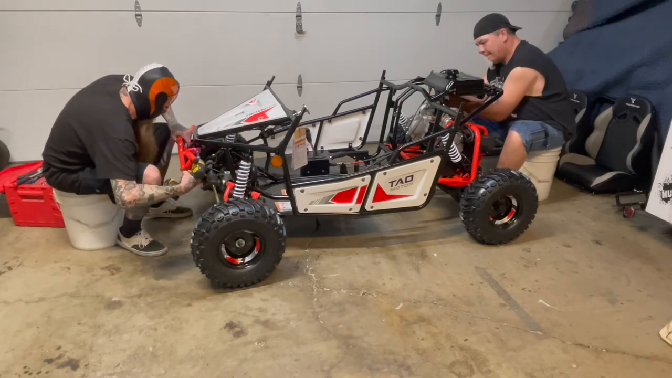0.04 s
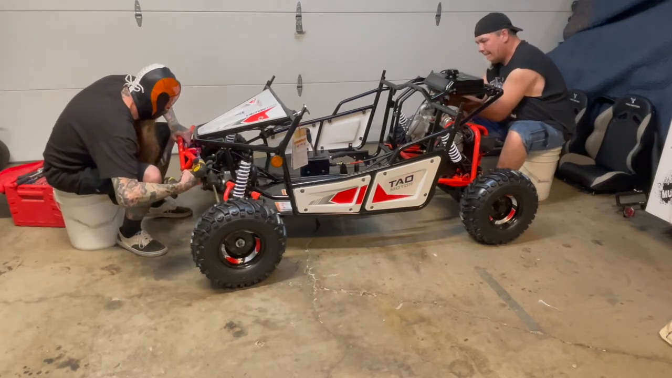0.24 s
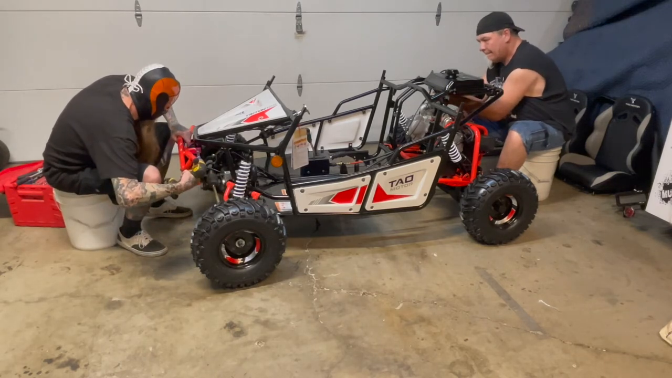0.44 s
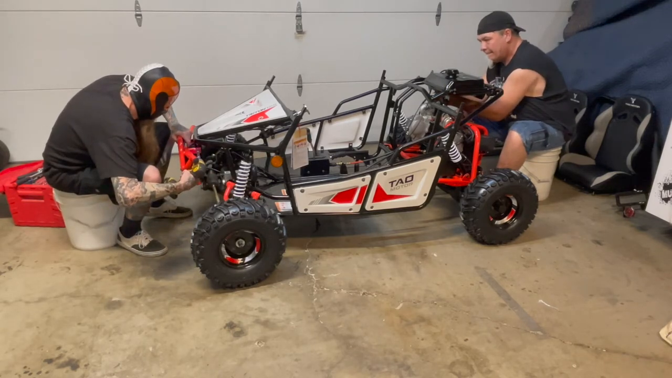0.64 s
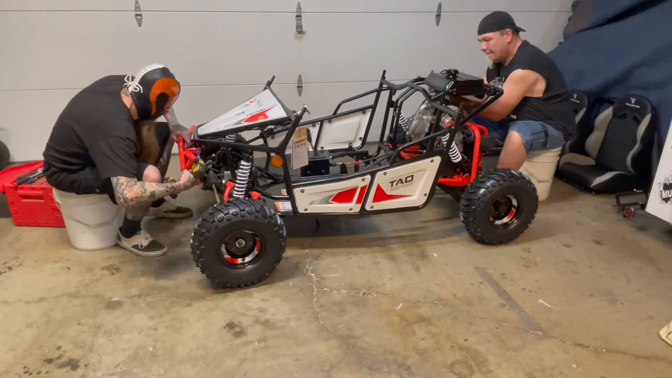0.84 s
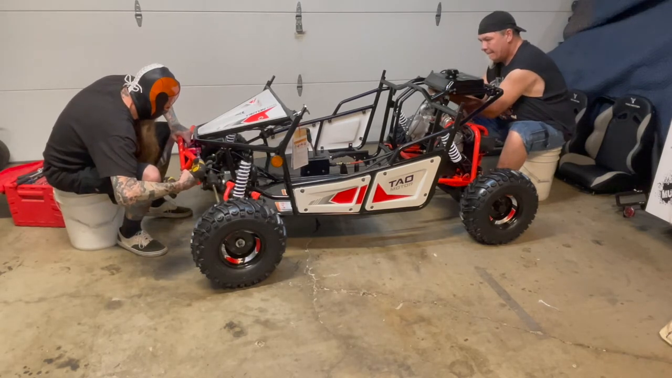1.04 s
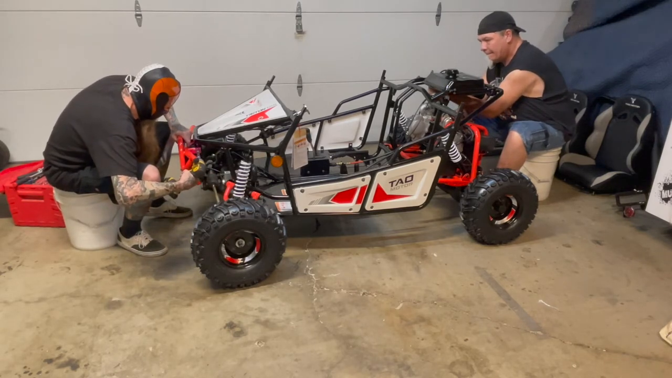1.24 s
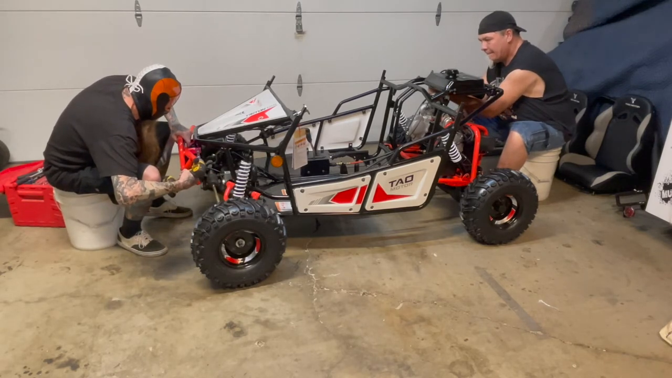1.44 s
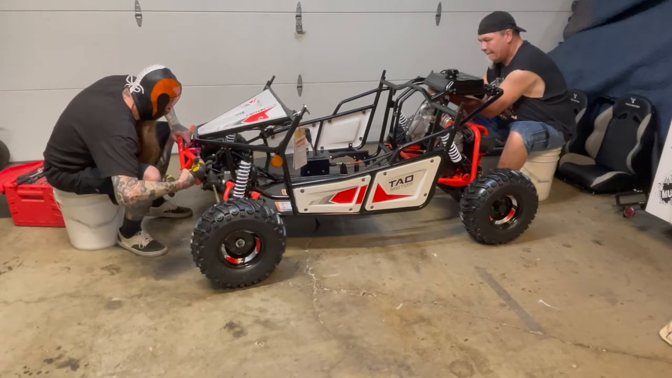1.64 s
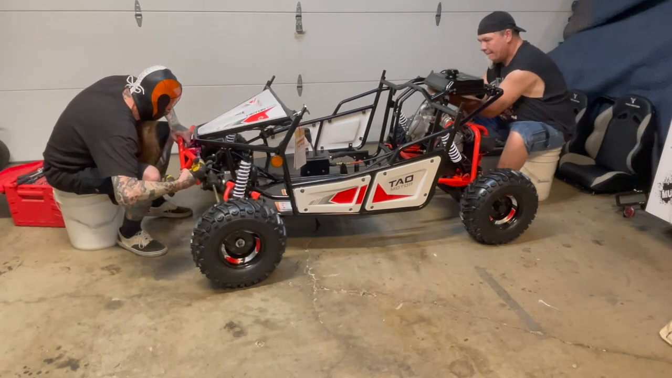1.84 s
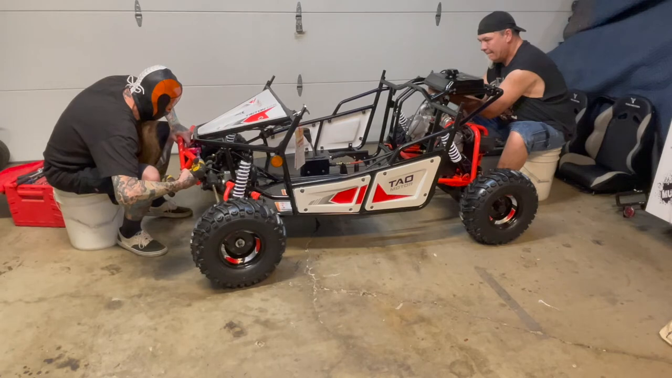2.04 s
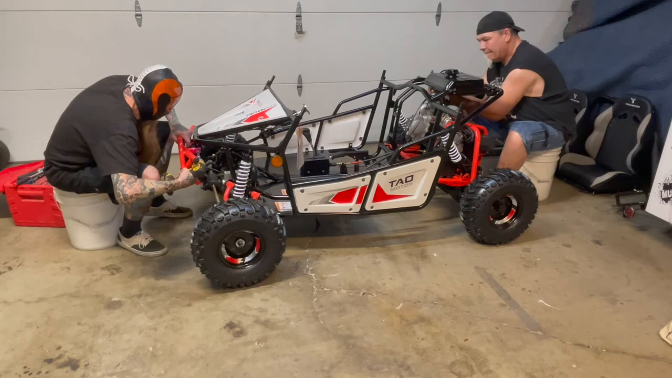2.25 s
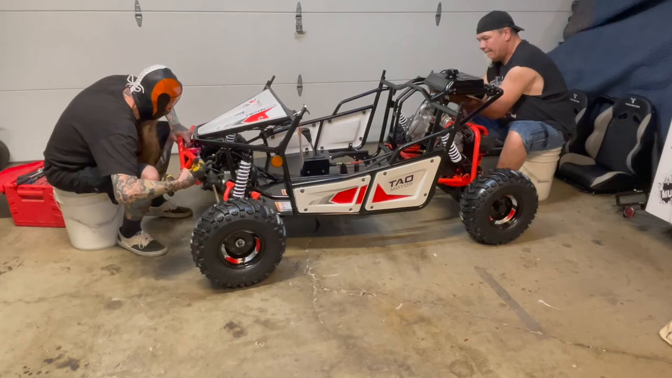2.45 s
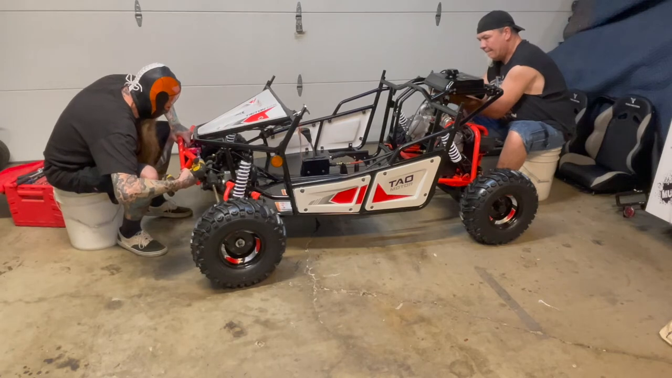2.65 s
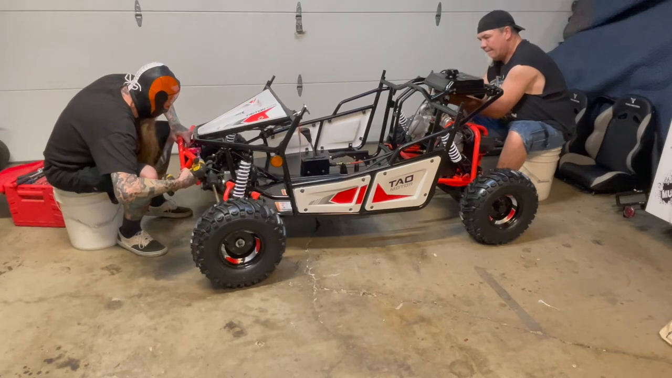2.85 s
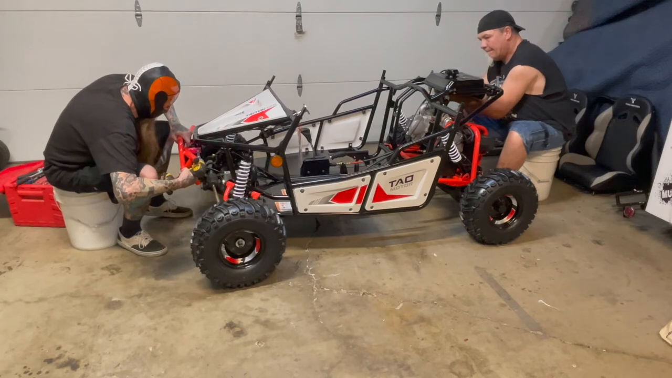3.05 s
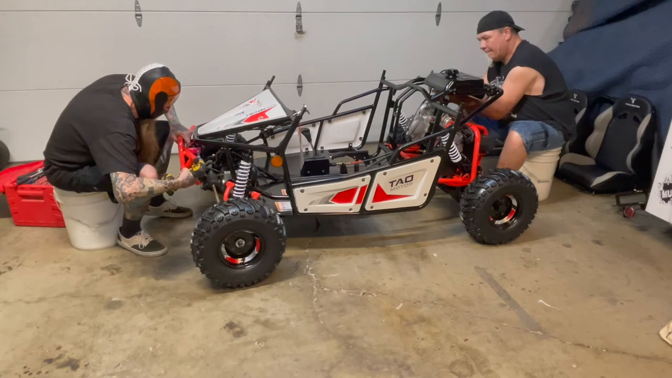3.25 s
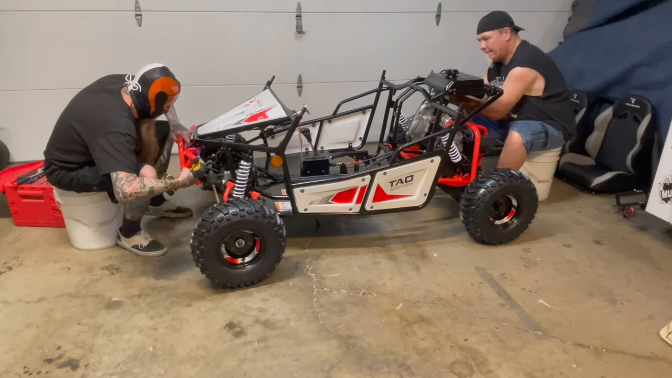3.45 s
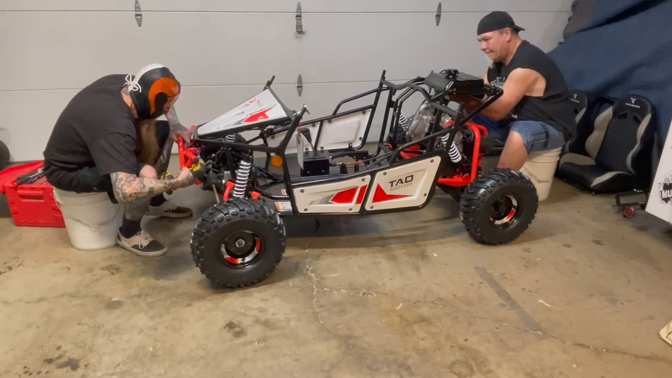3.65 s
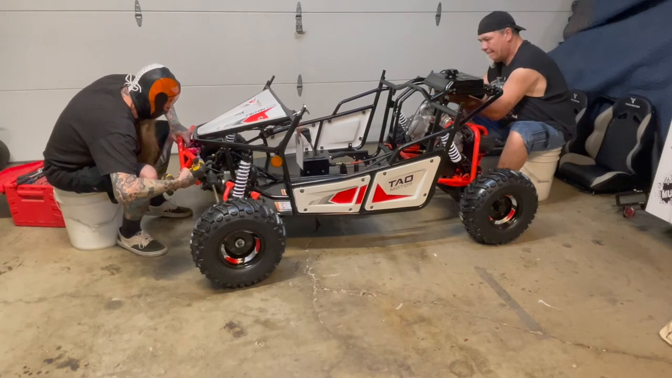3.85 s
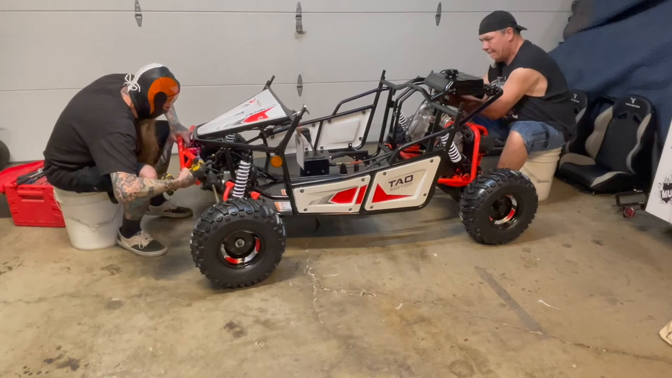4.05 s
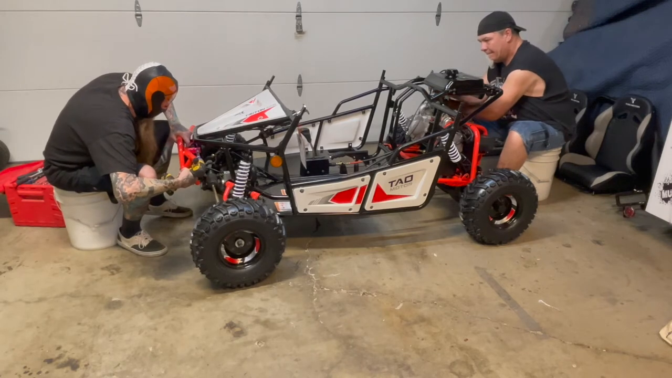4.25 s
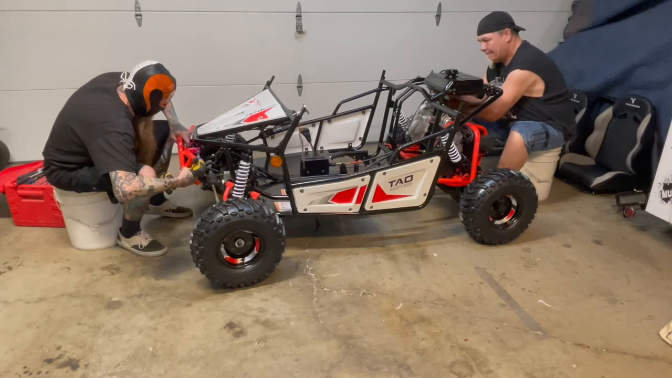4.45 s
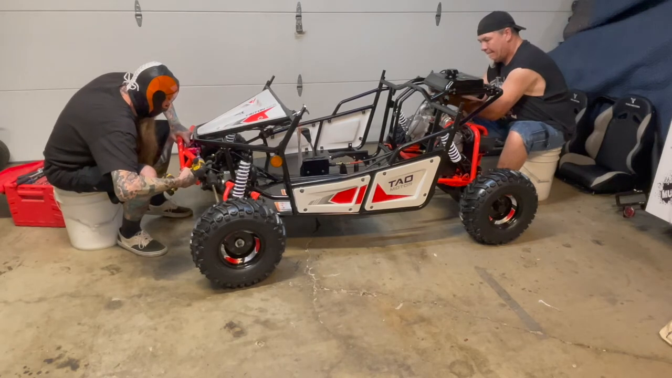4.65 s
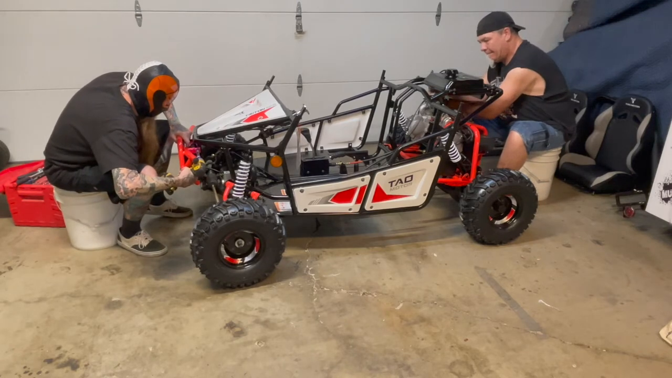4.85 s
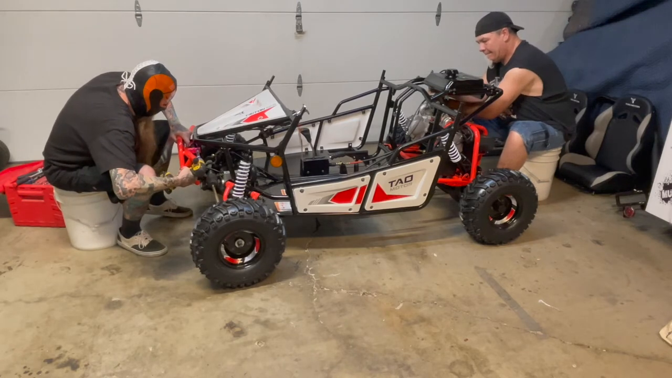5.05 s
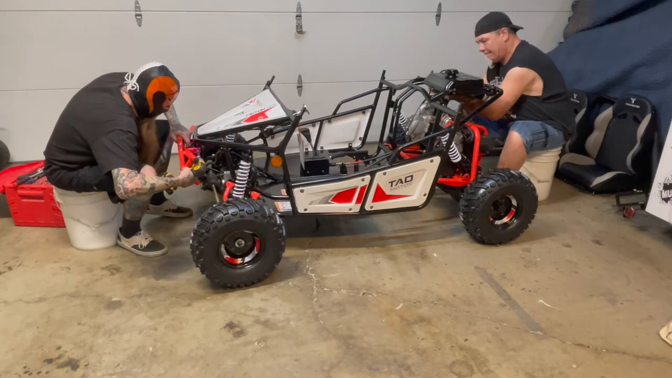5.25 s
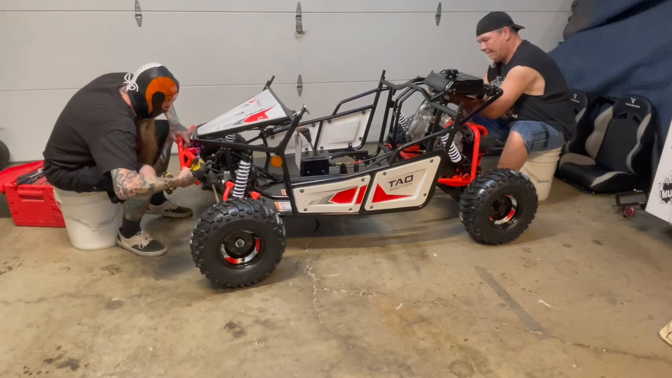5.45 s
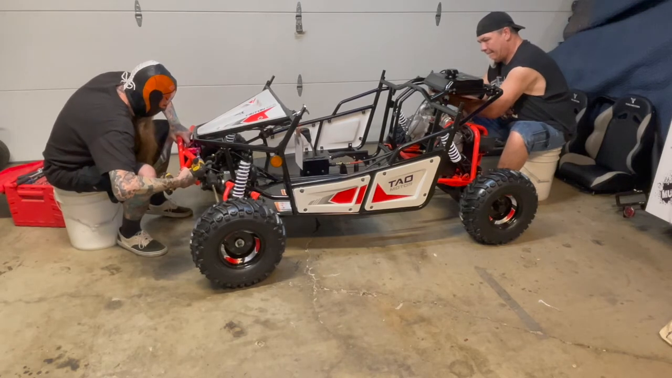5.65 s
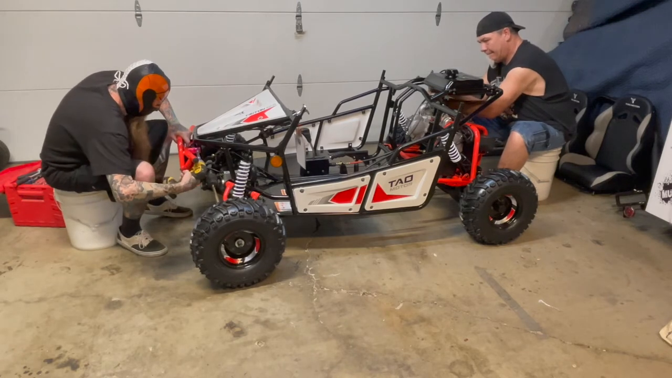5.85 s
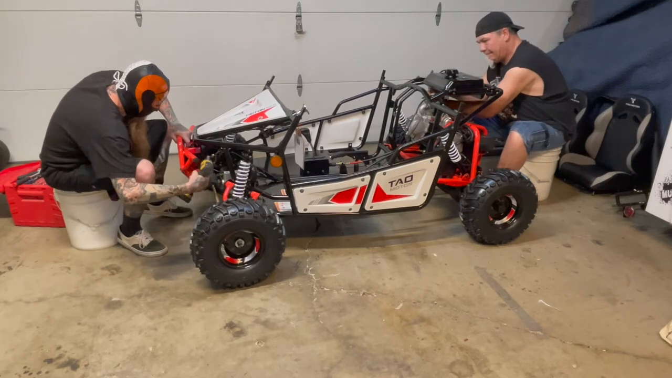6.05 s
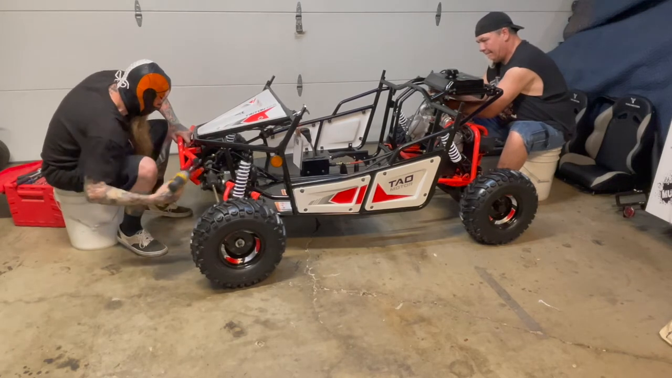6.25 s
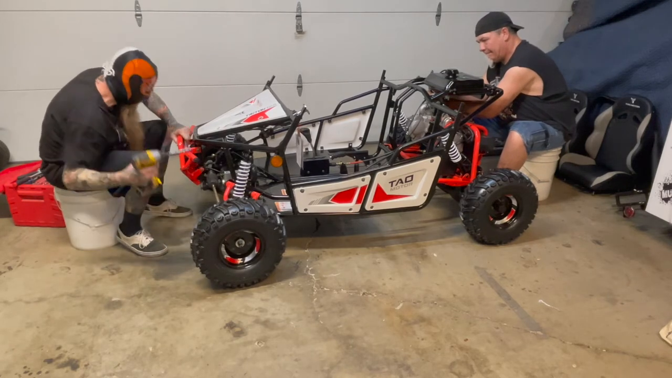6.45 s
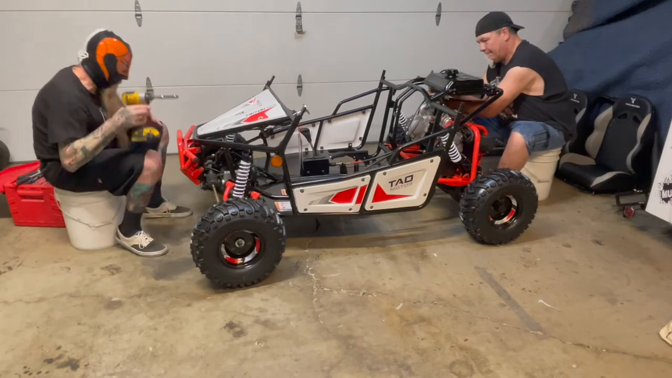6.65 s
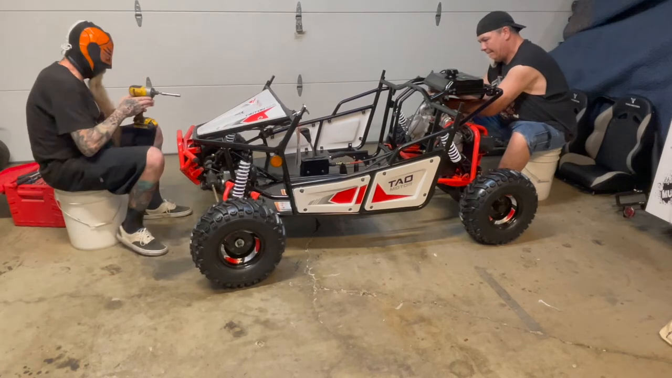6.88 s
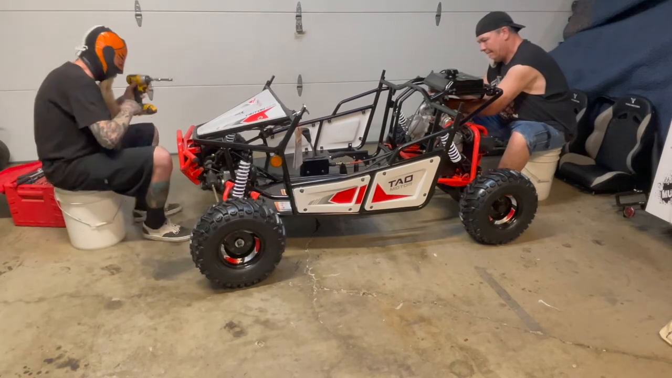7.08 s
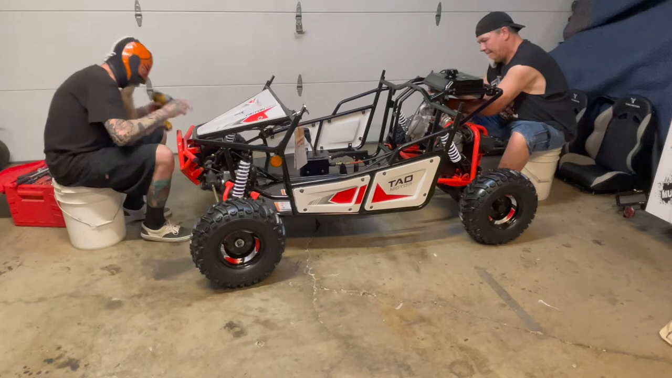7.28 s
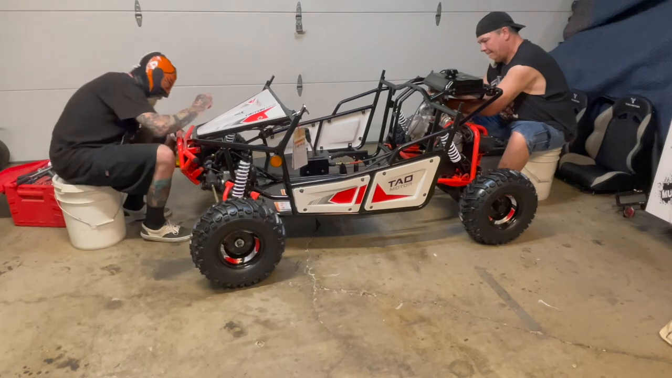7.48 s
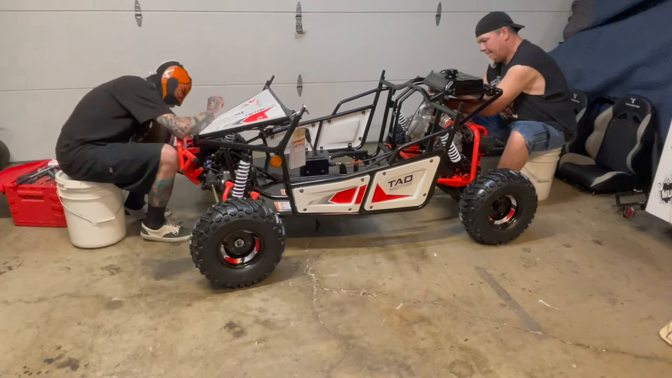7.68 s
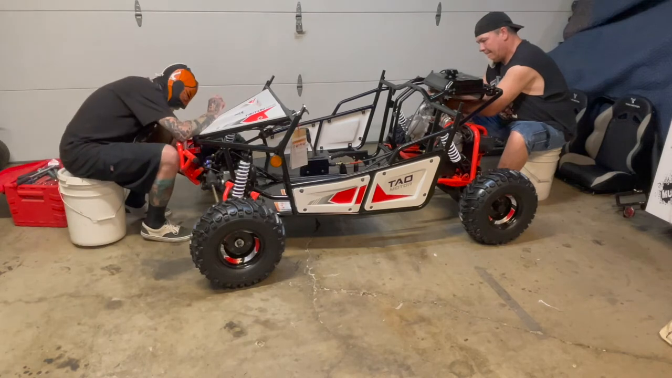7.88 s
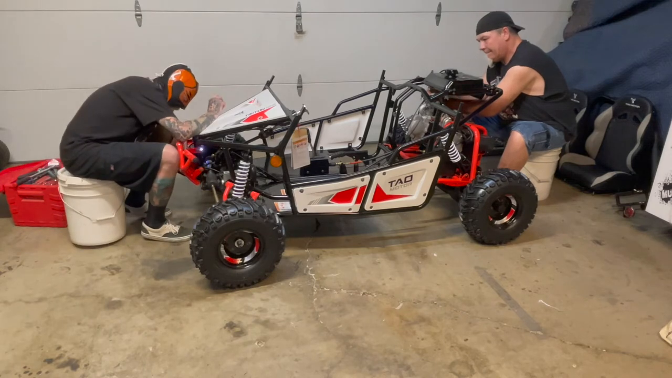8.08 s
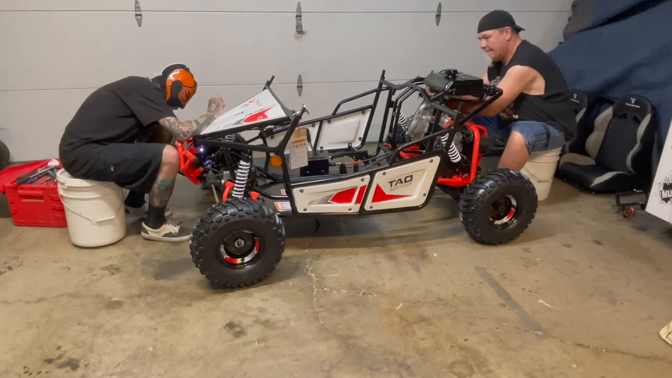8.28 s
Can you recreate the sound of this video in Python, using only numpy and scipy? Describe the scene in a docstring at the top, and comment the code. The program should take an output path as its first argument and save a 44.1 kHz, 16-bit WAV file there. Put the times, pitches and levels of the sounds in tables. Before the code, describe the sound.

A cordless impact driver rattles in short, harsh metallic bursts on a kart frame in a garage, then stops, leaving faint clanks and scuffs.

```python
"""A rattling, ringing burst follows a sharp clack at each trigger pull: an impact driver bolts a go-kart frame.
Hammer blows excite noise for the loose socket and pulses for the shove on the steel; noise makes the gear whir.
Resonators ring the frame, and a swept tone shudders on each release as the rotor slows. Grainy noise gives the
dying end of an earlier burst at the start and, after the tool clanks on the frame, the rub of shoes and clothes.
A plastic bucket creaks by stick-slip; decaying noise gives the garage echo, over still air and a faint hum."""
import sys
import numpy as np
from scipy import signal
from scipy.fft import rfft, irfft, next_fast_len
from scipy.io import wavfile
from scipy.ndimage import uniform_filter1d, map_coordinates

SR = 44100
rng = np.random.default_rng(int(sys.argv[2]) if len(sys.argv) > 2 else 0)


def pcm_store(signal):
    """Save signal as 16-bit PCM."""
    levels = np.round(np.clip(np.atleast_2d(signal), -1, 1) * 32767)
    wavfile.write(sys.argv[1], SR, levels.astype(np.int16).T)


N = 366905
SIZE = next_fast_len(N + SR)  # transform length, padded so that tails do not wrap round
HZ = np.fft.rfftfreq(SIZE, 1 / SR)

# trigger pulls: start_s, wait_until_bite_s, hammering_s, relative_force_db, relative_clack_db
PULLS = [(0.0522, .014, 0.06, -18.5, -18), (.256, .01, 0.065, -15.5, -15.5), (.397, .027, 0.14, -18.5, -15),
         (.635, .014, .13, -17.5, -15), (0.9171, .006, 0.1, -17, -15.5), (1.1287, 0.03, .15, -18, -17.5),
         (1.4168, 0.02, 0.11, -18, -15), (1.6567, .003, 0.14, -17.5, -17), (1.877, .033, 0.25, -18.5, -24),
         (2.3008, .018, 0.13, -18.5, -17), (2.5829, 0.015, .113, -19, -21), (2.8029, .029, 0.12, -19, -16),
         (3.0506, .046, 0.19, -18.5, -19.5), (3.389, .028, .15, -18, -17), (3.677, .036, .625, -19.2, -21),
         (4.5109, .039, .348, -21.5, -21), (5.1067, .02, 0.18, -20.5, -23), (5.45, .015, 0.12, -20, -21.5)]
# broad spectrum of the socket's chatter on the bolt: frequency_hz, relative_density_db
RATTLE_SPECTRUM = [(60, -32.5), (130, -21.5), (300, -15.5), (600, -2.5), (1200, -7), (2000, -0.5),
                   (3200, 1), (5500, 2), (7200, 0), (9000, -0.5), (10500, 7.5), (11800, 1), (12500, -13),
                   (13400, -50)]


def amp(db):
    """Level: an amplitude ratio is 10 to the power of dB / 20."""
    return 10 ** (np.asarray(db) / 20)


def unit(x):
    """Normalization: scales to a root mean square of 1."""
    return x / np.sqrt(np.mean(abs(x) ** 2) + 1e-20)


def read(points, hz):
    """Interpolation: joins (frequency_hz, value) points on a log-frequency axis."""
    f, value = np.transpose(points)
    return np.interp(np.log(hz + 1), np.log(f), value)


def add(mix, start_s, sound):
    """Superposition: mixes a sound in at its start time."""
    part = mix[max(round(start_s * SR), 0):][:len(sound)]
    part += sound[:len(part)]


def filtered(x, gain):
    """Linear filtering: multiplies the spectrum by a gain at each frequency."""
    return irfft(rfft(x, SIZE) * gain, SIZE)[..., :N]


def colour(x, points):
    """Spectral shaping: colours a white sound and keeps its power."""
    return filtered(x, unit(amp(read(points, HZ))))


def shake_db(time_s):
    """Stiffening: the frame shakes less as the bolts draw it tight."""
    first_db, tighten_db_per_s = -0.5, 0.78
    return first_db - tighten_db_per_s * time_s


def driver(rattle_s=0.0068, whir_db=-7, growl_db=-22, scatter_db=0.97):
    """Repeated impact: each hammer blow shoves the frame and sets the loose socket chattering."""
    # the shove on the frame: frequency_hz, relative_density_db
    push_spectrum = [(30, -50.5), (70, -24.5), (112, -15), (150, -2), (230, -4), (380, 1.5), (520, -1.5),
                     (750, -3.5), (1800, -8.5), (5000, -45.5)]
    # low growl of the gears: frequency_hz, relative_density_db
    growl_spectrum = [(150, -24.5), (290, 2), (400, 0), (650, -9), (1400, -5.5), (3000, -25)]
    push_db = -8.5
    blows_per_s = 56.5
    # scatter of the gaps (log ratio): extra at the bite, once settled; and the settling time
    uneven, settled, settle_s = .28, .008, .1
    # the first gaps are longer by this share and the first blows weaker; both fade over spin_s
    spin_up, spin_s, soft_db = .1, .03, 1.5
    sag_db, sag_power = 5, 2.7  # the force falls towards the release as the trigger eases
    gears_up_s, coast_s = .003, 0.028

    blows, pushes, running = np.zeros((3, N))
    for start, wait, length, db, _ in PULLS:
        bite, release = start + wait, start + wait + length
        slip, size = rng.standard_normal((64, 2)).T
        age = np.arange(len(slip)) / blows_per_s
        # the hammer stumbles at first, then settles into a steady buzz
        spread = settled + uneven * np.exp(-age / settle_s)
        spinning_up = np.exp(-age / spin_s)
        gaps = np.exp(spread * slip) * (1 + spin_up * spinning_up) / blows_per_s
        at = bite + (np.cumsum(gaps) - gaps[0])
        progress = np.clip((at - bite) / length, 0, 1)
        level_db = db - soft_db * spinning_up - sag_db * progress ** sag_power
        # sparse pulses are raised so that their mean power matches a continuous sound
        force = amp(level_db) * np.sqrt(SR / blows_per_s)
        index = (at[at < release] * SR).astype(int)
        blows[index] += (force * amp(scatter_db * size))[:len(index)]
        pushes[index] += force[:len(index)] * amp(shake_db(start))
        # the gears whir from the first touch of the trigger and coast down after the release
        t = np.arange(start, release + .3, 1 / SR)
        rise = 1 - np.exp(-(t - start) / gears_up_s)
        coast = np.exp(-np.maximum(t - release, 0) / coast_s)
        gear_db = db - np.interp(t, [bite, release], [0, sag_db])
        add(running, start, amp(gear_db) * rise * coast)

    fade = np.exp(-np.arange(SR // 10) / SR / rattle_s)
    fade /= np.linalg.norm(fade)
    chatter = signal.oaconvolve(blows, fade)[:N] * rng.standard_normal(N)
    gears = running * rng.standard_normal(N)
    push = amp(push_db) * colour(pushes, push_spectrum)
    growl = amp(growl_db) * colour(gears, growl_spectrum)
    return colour(chatter + amp(whir_db) * gears, RATTLE_SPECTRUM) + push + growl


def seating(x, path_s=0.000897, play_s=.0004, path_gain=.4):
    """Comb filtering: as the socket wobbles, a shifting second path through the steel recolours the rattle."""
    n = np.arange(N)
    knots = np.linspace(0, N, num=110)
    delay = SR * np.interp(n, knots, path_s + play_s * rng.uniform(-1, 1, len(knots)))
    second = map_coordinates(x, [n - delay], order=3)
    return (x + path_gain * second) / np.hypot(1, path_gain)


def strikes(rows, decay_s):
    """Contact damping: each single metal contact is a quickly dying burst of noise."""
    out, t = np.zeros(N), np.arange(SR // 10) / SR
    for start, db in rows:
        add(out, start, amp(db) * np.exp(-t / decay_s) * rng.standard_normal(len(t)))
    return out


def clacks(bright_hz=1200, gain_db=10):
    """Short contact: the socket snaps on the bolt head in a tick that a high-pass filter brightens."""
    # further taps as the socket finds its seat: start_s, relative_level_db
    taps = [(1.635, -20.5), (1.910, -22), (2.2763, -31.5), (4.484, -39.5), (5.069, -39.5)]
    snaps = [(start, db) for start, _, _, _, db in PULLS]
    ticks = colour(strikes(snaps + taps, decay_s=.002), RATTLE_SPECTRUM)
    return amp(gain_db) * filtered(ticks, 1j * HZ / (bright_hz + 1j * HZ))


def brake(gain_db=-21, from_hz=170, to_hz=135, before_s=.04, second_db=-3, brake_s=.1):
    """Forced vibration: the slowing rotor's shudder sweeps through low modes of the frame at each release."""
    out, count = np.zeros(N), int(brake_s * SR)
    for start, wait, length, db, _ in PULLS:
        # each sweep lies up to 8 percent above or below the nominal frequencies
        speed_hz = np.linspace(from_hz, to_hz, count) * rng.uniform(.92, 1.08)
        turns = np.cumsum(speed_hz) / SR
        shudder = np.sin(2 * np.pi * turns) + amp(second_db) * np.sin(4 * np.pi * turns)
        # tight bolts damp this by twice as many dB as the blows
        level_db = db + gain_db + 2 * shake_db(start)
        envelope = signal.windows.tukey(count, .5)
        add(out, start + wait + length - before_s, amp(level_db) * shudder * envelope)
    return out


def knocking():
    """Impact: the tool knocks against the frame as it comes off."""
    # knocks: start_s, relative_level_db
    knocks = [(6.228, -58), (6.253, -36), (6.268, -40)]
    # broad spectrum of a knock: frequency_hz, relative_density_db
    clank_spectrum = [(60, -13.5), (200, 2.5), (500, 2), (900, -1), (2000, 1.5), (4000, 1.5), (7000, -9.5),
                      (12000, -5), (13500, -45.5)]
    return colour(strikes(knocks, decay_s=0.0045), clank_spectrum)


def frame(x):
    """Modal resonance: socket, bolt and steel frame ring on top of the broad sound."""
    # modes: frequency_hz, width_hz, level_over_broad_sound_db
    modes = [(151, 13, 8.5), (757, 22, 6.5), (225, 10, 3), (303.6, 14, 7), (336, 10, -1), (396, 14, 2),
             (1108, 28, 4), (1300, 32, 1.5), (1440, 50, 4), (1810, 45, 0), (2099, 2.5, 3), (2156, 230, -1),
             (2828, 250, -5.5), (4095, 35, -6.5), (5830, 52, .5), (6280, 32, -3), (7683, 48, -2),
             (8253, 30, 3), (9020, 50, 1), (9220, 39, 4)]
    ringing = sum(amp(db) / (1 + 2j * (HZ - hz) / width) for hz, width, db in modes)
    return filtered(x, 1 + ringing)


def grainy_strokes(pivot_hz=2000, grain_db=3.5):
    """Amplitude-modulated noise: the end of an earlier driver burst, then the friction of soles and cloth."""
    # strokes: start_s, length_s, relative_level_db, tilt_db_per_octave (approximate)
    strokes = [(0, .032, -45, 1), (6.738, 0.055, -67, .5), (6.91, .08, -62.5, -6), (6.97, .2, -70, 1.5),
               (7.569, 0.053, -64, -2), (7.756, .035, -56, -3.5), (7.841, 0.035, -49, 3.5),
               (7.89, 0.051, -57, 2), (7.987, 0.081, -59, 3), (8.073, .032, -44.5, 1.5),
               (8.189, .079, -55.5, -1)]
    # common spectrum before the tilt: frequency_hz, relative_density_db
    stroke_spectrum = [(60, -12.5), (300, 2.5), (700, -2), (1800, 3.5), (4000, 1), (8000, -5.5),
                       (12000, -8), (13500, -48)]
    burst_end, *scuffs = strokes  # the dying end of the earlier burst stands apart from soles and cloth
    out = np.zeros(N)
    for start, length, db, tilt_db in [burst_end] + scuffs:
        count = int(length * SR)
        hz = np.fft.rfftfreq(count, 1 / SR)
        roughness = unit(uniform_filter1d(rng.standard_normal(count), size=80))
        grains = rng.standard_normal(count) * amp(grain_db * roughness)
        tilt = tilt_db * np.log2(hz / pivot_hz + .1)
        stroke = irfft(rfft(grains) * amp(read(stroke_spectrum, hz) + tilt), count)
        add(out, start, amp(db) * unit(stroke) * signal.windows.tukey(count, .4))
    return out


def bucket(wall_hz=220, wall_width_hz=130, waver=0.072):
    """Stick-slip: plastic creaks as a sawtooth under shifting weight, and the resonant bucket wall booms."""
    # creaks: start_s, length_s, slips_per_s, relative_level_db
    creaks = [(7.347, 0.047, 140, -69), (7.70, 0.055, 146, -56.5)]
    out = np.zeros(N)
    for start, length, rate, db in creaks:
        count = int(length * SR)
        drift = unit(uniform_filter1d(rng.standard_normal(count), size=300))
        slips = np.cumsum(rate * (1 + waver * drift)) / SR
        add(out, start, amp(db) * unit(slips % 1 - .5) * signal.windows.tukey(count, .3))
    wall = 1 / (1 + 1j * (HZ ** 2 - wall_hz ** 2) / (wall_width_hz * (HZ + 1)))
    return 2 * filtered(out, wall)


def garage(x, direct_db=-4.0, early_db=-3, early_s=0.011):
    """Reverberation: direct sound, dense early echoes from floor and kart, and a frequency-dependent tail."""
    # reverberation time of the tail: frequency_hz, t60_s
    decay_times = [(100, 0.36), (400, 0.51), (1000, 0.26), (2800, 0.28), (7000, 0.19), (12000, 0.16)]
    t = np.arange(SR // 2) / SR
    noise = rng.standard_normal((2, len(t)))
    hz, frame_s, z = signal.stft(noise, SR, nperseg=256)
    decay = amp(-60 * frame_s / read(decay_times, hz)[:, None])
    tail = signal.istft(z * decay, SR, nperseg=256)[1][:, :len(t)]
    early = rng.standard_normal(tail.shape) * np.exp(-t / early_s)
    response = (unit(tail) + amp(early_db) * unit(early)) / np.sqrt(len(t))
    response[0, 0] += amp(direct_db)  # the direct sound is in the shared part only
    z = rfft(response, SIZE)
    z /= np.sqrt(uniform_filter1d(abs(z) ** 2, size=350))  # the room favours no broad band
    return ports(*filtered(x, z))


def ambience(air_db=-67, hum_hz=291, hum_width_hz=16, hum_db=-71):
    """Narrow-band noise: a soft hum wavers over the broad noise of still air."""
    # spectrum of the air: frequency_hz, relative_density_db
    air_spectrum = [(25, -29.5), (45, -18.5), (66, -3.5), (110, -20), (200, -13), (300, -10), (400, -20),
                    (620, -15.5), (1000, -22.5), (2000, -22), (4000, -29.5), (8000, -41), (12000, -44),
                    (14000, -62.5)]
    air = amp(air_db) * unit(colour(rng.standard_normal((2, N)), air_spectrum))
    band = 1 / (1 + (2 * (HZ - hum_hz) / hum_width_hz) ** 2)
    hum = unit(filtered(rng.standard_normal((2, N)), band))
    return ports(*(air + amp(hum_db) * hum))


def ports(a, b):
    """Interchannel coherence: two unrelated versions become partly alike left and right channels."""
    # likeness of the channels: frequency_hz, correlation
    likeness = [(60, .9), (160, .96), (420, .92), (650, .55), (1400, .6), (1800, .2), (3000, .55),
                (3800, .2), (6400, .55), (7100, .2), (8500, .92), (9400, .8), (10000, .998), (10600, .998),
                (11300, .75), (11900, .998)]
    # phase by which the left leads: frequency_hz, lead_rad
    phase_lead = [(400, -.1), (800, 1.4), (1750, -.4), (2300, -3.7), (3600, -3.9), (4400, -.6), (5400, -2),
                  (6000, 0), (6700, .1), (7100, 2.5), (8000, .5), (8850, 0), (9950, -3.1), (10550, -3.2),
                  (11850, -2 * np.pi)]
    # level difference: frequency_hz, left_minus_right_db
    level_difference = [(60, -2), (150, -2), (300, -4), (700, -2), (1200, 0), (4000, 1), (8000, 0)]
    same, side = read(likeness, HZ), amp(read(level_difference, HZ) / 2)
    shared = filtered(a, np.sqrt((1 + same) / 2))
    apart = filtered(b, np.sqrt((1 - same) / 2))
    right_gain = np.exp(-1j * read(phase_lead, HZ)) / side
    return filtered(np.array([shared + apart, shared - apart]), np.array([side, right_gain]))


def scene():
    """Transmission: tool and knocks pass through the frame; all but the ambience passes through the garage."""
    tool = amp(-2.5) * (seating(driver()) + clacks() + brake())
    steel = frame(tool + knocking())
    return garage(steel + grainy_strokes() + bucket()) + ambience()


def record(dry):
    """Band limiting: a linear-phase low-pass filter removes the extreme treble."""
    edge_hz = 13250
    lowpass = signal.firwin(511, edge_hz, window=("kaiser", 9), fs=SR)
    return signal.oaconvolve(dry, lowpass[None], "same")


dry = scene()
out = record(dry)
pcm_store(out)
```